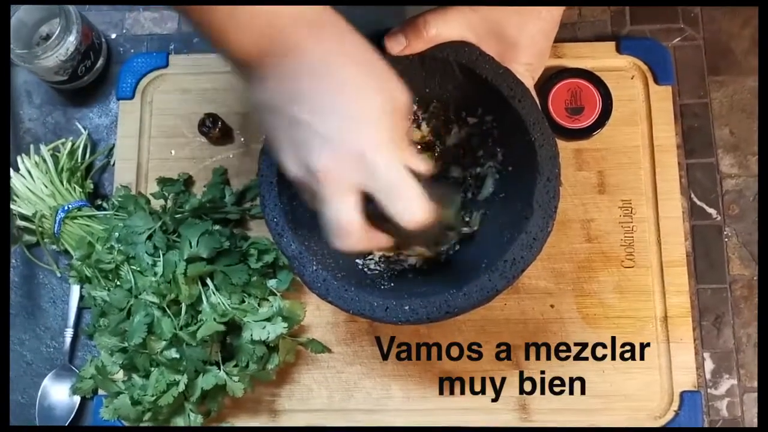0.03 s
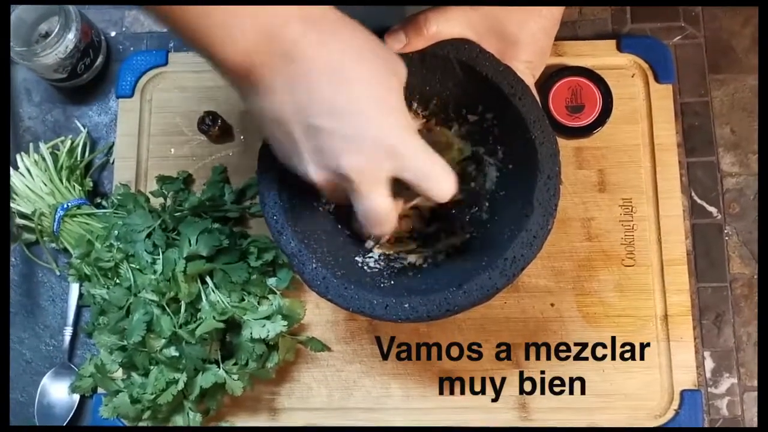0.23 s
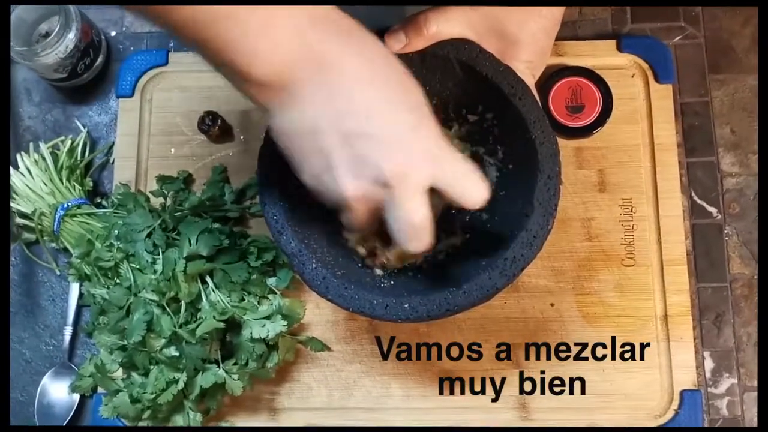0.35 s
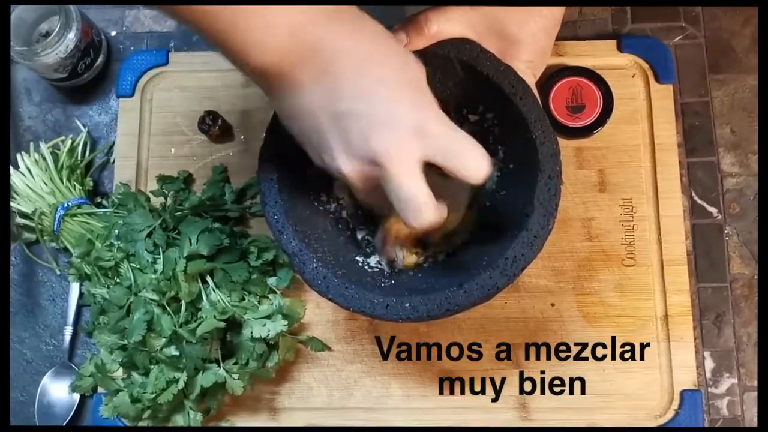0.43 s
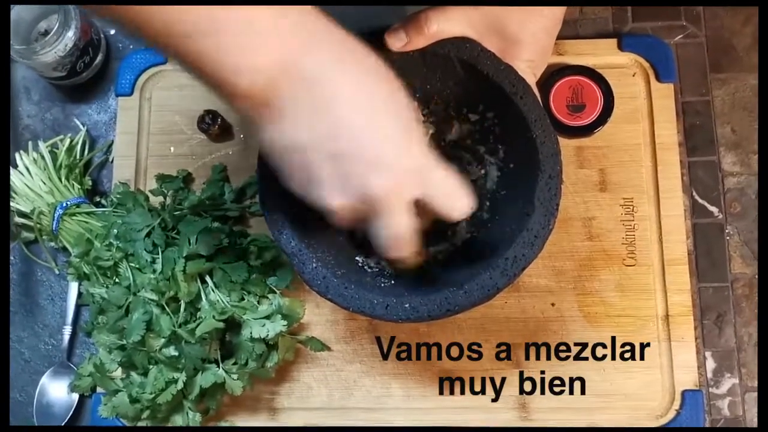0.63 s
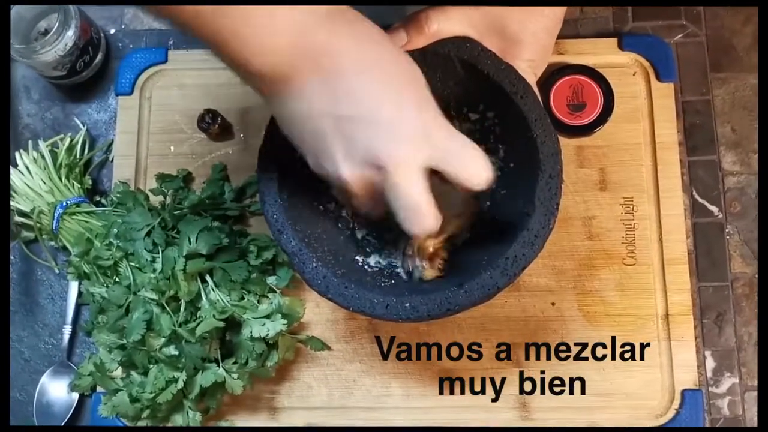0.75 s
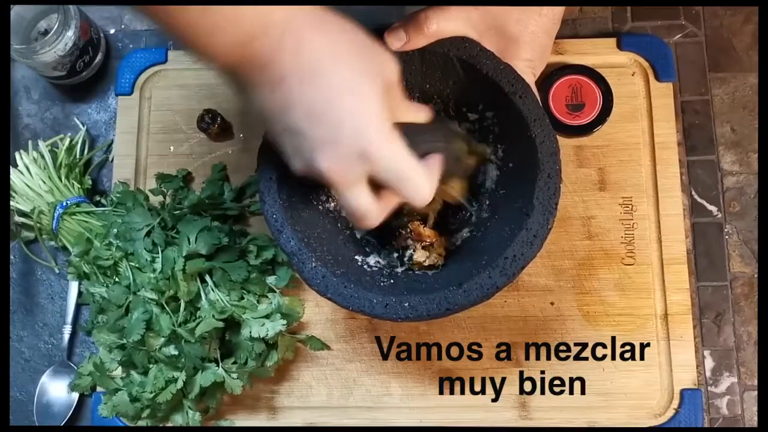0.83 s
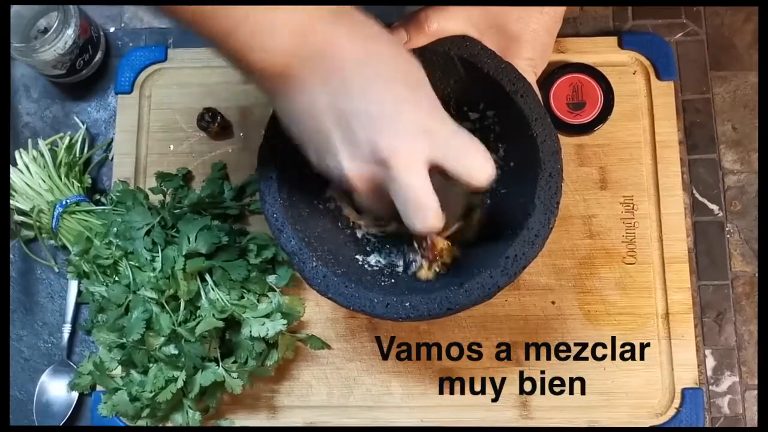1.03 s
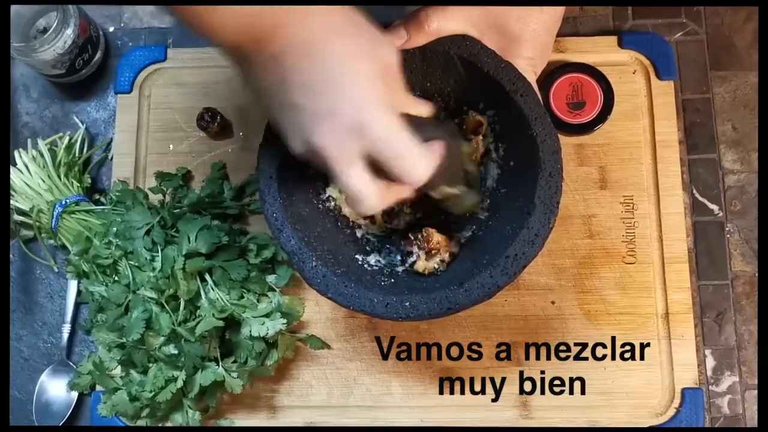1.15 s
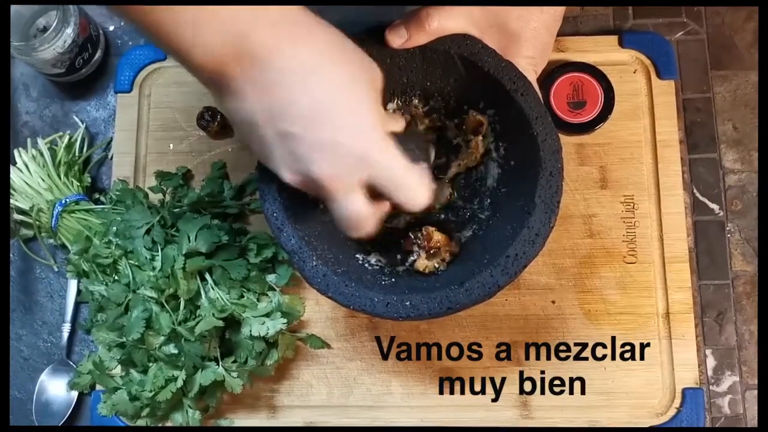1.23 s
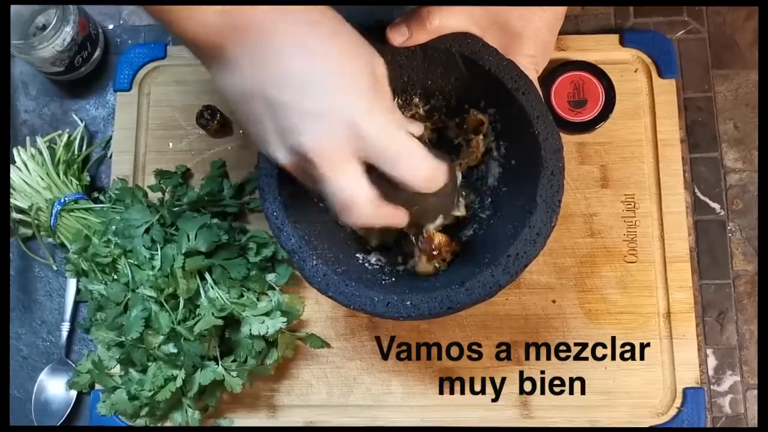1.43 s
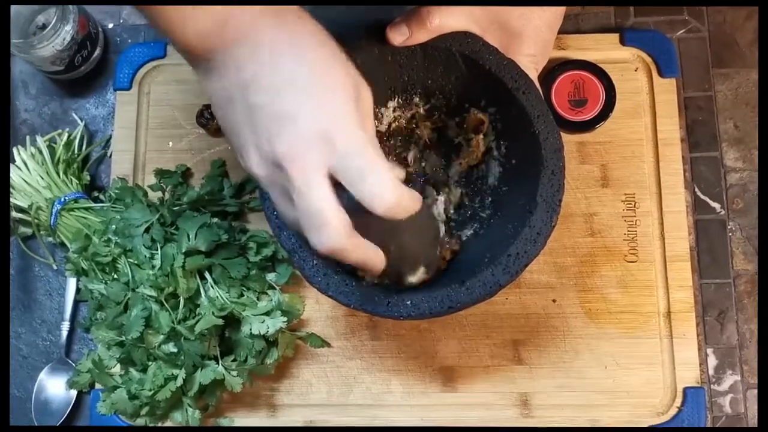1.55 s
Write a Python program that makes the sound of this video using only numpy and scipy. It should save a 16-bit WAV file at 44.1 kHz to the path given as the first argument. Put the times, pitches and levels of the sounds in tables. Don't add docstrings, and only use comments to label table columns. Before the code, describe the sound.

Close up in a quiet kitchen, stone rubs and knocks on stone, with hollow low-mid clacks, stuttering scrapes, fine hiss and tiny seed cracks, starting softly, hitting hardest midway, then stopping before faint room noise.

```python
import sys
import numpy as np
from scipy import signal
from scipy.fft import rfft, irfft, next_fast_len
from scipy.io import wavfile

SR = 44100
rng = np.random.default_rng(int(sys.argv[2]) if len(sys.argv) > 2 else 0)


def digitize_waveform(pressure):
    field = np.atleast_2d(pressure).T
    bounded = np.clip(field, -1, 1)
    quanta = np.round(bounded * 32767).astype(np.int16)
    wavfile.write(sys.argv[1], SR, quanta)


def voltage_ratio(level):
    return 10 ** (np.asarray(level, float) / 20)


N = 70560

# t/s, level/dB, upper modes' level/dB, pestle ping level/dB
KNOCKS = [(0.153, -20.5, -24.5, -39.5), (0.212, -29, -13, -47.5), (0.325, -11, -8, -48.5),
          (0.491, -11, -7.5, -52), (0.519, -16.5, -10.5, -46), (0.548, -12, -1, -50.5),
          (0.625, -5, -6, -33.5), (0.699, -3, -1, -35.5), (0.957, -4.5, -0.5, -26.5),
          (1.001, -6.5, -24, -34.5), (1.033, -10, -1, -30.5), (1.222, -27, -9, -59),
          (1.244, -11, -14.5, -49), (1.266, -6.5, -7.5, -40.5)]
BITE_SHARES = [0.32, 0.54, 0.13]
# f/Hz, level/dB, T60/s
LOW_MODES = [(516, -9.5, 0.026), (561.6, 4.5, 0.052), (644, -5, 0.018), (695.7, -4.5, 0.068),
             (783, -14, 0.085)]
HIGH_MODES = [(790.7, -6.5, 0.066), (925, 1.5, 0.045), (1007, -6, 0.053), (1107, -4, 0.04),
              (1327, -10.5, 0.025), (1456, -17.5, 0.045), (1640, -34.5, 0.076)]
# f/Hz, level/dB, T60/s
PESTLE_MODES = [(2050, -23.5, 0.14), (2120, -5.5, 0.017), (2335, 3, 0.023), (2680, -1.5, 0.013),
                (3300, -20.5, 0.011), (3800, -16, 0.012)]
# f/Hz, level/dB, T60/s
BOARD_MODES = [(233.4, -36, 0.063), (286.9, -36, 0.22), (375, -41.5, 0.12)]


def knocks():
    knock_db, strike_spread_db, bite_lead_s = -6.5, 2, 0.001
    focus = 1.3
    splash_db, splash_t60_s = -4, 0.36
    t, db, high_db, ping_db = np.transpose(KNOCKS)
    modes = [(mode, 0 * db, 1) for mode in LOW_MODES]
    modes += [(mode, high_db + 6.0, -1) for mode in HIGH_MODES]

    bowl = np.zeros(N)
    for (hz, mode_db, t60), extra_db, sense in modes:
        luck_db = strike_spread_db * rng.standard_normal(len(t))
        strength = voltage_ratio(db + extra_db + focus * mode_db + luck_db)
        clicks = np.zeros(N)
        for cycle, share in enumerate(BITE_SHARES):
            clicks[((t - bite_lead_s + cycle / hz) * SR).astype(int)] = share * strength
        bowl += sense * ring(clicks, hz, t60)

    at = (t * SR).astype(int)
    on_pestle, on_board = np.zeros((2, N))
    on_pestle[at] = voltage_ratio(db + ping_db)
    on_board[at] = voltage_ratio(db)
    ping = band(body(on_pestle, PESTLE_MODES), 1700, 4200)
    thud = band(body(on_board, BOARD_MODES), 190, 450)

    fade = signal.lfilter([voltage_ratio(splash_db)], [1, -voltage_ratio(-60 / (splash_t60_s * SR))], on_pestle + 1e-18)
    splash = band(fade * rng.standard_normal(N), 1140, 2490)
    return radiate(voltage_ratio(knock_db) * bowl) + ping + thud + splash


# peak t/s, level/dB, f/Hz, build-up time/s
JUDDERS = [(0.214, -12.5, 585, 0.0019), (0.253, -4.5, 573, 0.0064), (0.277, -14.5, 577, 0.027),
           (0.318, -13, 586, 0.0071), (0.329, -8, 595, 0.0029), (0.343, -13, 640, 0.0021),
           (0.363, -16, 585, 0.01), (0.398, -9.5, 600, 0.004), (0.404, -22.5, 563, 0.0049),
           (0.436, -14, 615, 0.0021), (0.468, -7.5, 586, 0.0035), (0.491, -11, 592, 0.0021),
           (0.522, -23.5, 577, 0.0015), (0.537, -10, 590, 0.003), (0.55, -6.5, 663, 0.0025),
           (0.56, -7.5, 566, 0.0035), (0.574, -5.5, 605, 0.0026), (0.592, -17.5, 497, 0.0026),
           (0.629, -7, 630, 0.0009), (0.693, -6, 585, 0.0054), (0.701, -12.5, 575, 0.0011),
           (0.715, -2, 570, 0.0066), (0.733, -10, 573, 0.021), (0.74, -15.5, 563, 0.0035),
           (0.785, -16, 583, 0.0067), (0.855, -14.5, 636, 0.0028), (0.862, -12, 620, 0.0015),
           (0.875, -15, 551, 0.0031), (0.911, -20, 530, 0.0015), (0.921, -10, 521, 0.0036),
           (0.962, -12, 654, 0.0037), (1.004, -15, 608, 0.004), (1.038, -4.5, 596, 0.0035),
           (1.044, -33.5, 550, 0.0072), (1.06, -18.5, 625, 0.0014), (1.068, -19, 598, 0.016),
           (1.099, -18.5, 599, 0.0022), (1.12, -11.5, 569, 0.013), (1.182, -16.5, 560, 0.0078),
           (1.19, -14, 594, 0.007), (1.2, -20.5, 562, 0.0064), (1.225, -21, 602, 0.0045),
           (1.258, -17.5, 553, 0.0034), (1.269, -6, 631, 0.0014), (1.291, -16, 547, 0.0025),
           (1.298, -15.5, 572, 0.011)]
# peak t/s, level/dB, f/Hz, build-up time/s
HIGH_JUDDERS = [(0.217, -13.5, 812, 0.0016), (0.235, -21.5, 966, 0.0048), (0.254, -17.5, 915, 0.0018),
                (0.327, -27.5, 985, 0.0016), (0.395, -17.5, 921, 0.0031), (0.462, -20, 802, 0.0069),
                (0.47, -19, 1042, 0.0027), (0.493, -15, 901, 0.003), (0.522, -15, 732, 0.00098),
                (0.55, -25.5, 770, 0.0012), (0.561, -11, 922, 0.0039), (0.57, -10, 933, 0.0074),
                (0.585, -21, 1014, 0.0017), (0.594, -16.5, 834, 0.0011), (0.627, -9.5, 870, 0.00086),
                (0.703, -18, 864, 0.0097), (0.713, -42, 925, 0.0068), (0.723, -23.5, 1030, 0.002),
                (0.732, -29, 880, 0.002), (0.762, -17, 928, 0.0029), (0.788, -23.5, 930, 0.0046),
                (0.869, -21.5, 934, 0.0023), (0.88, -12, 886, 0.0014), (0.915, -15, 999, 0.003),
                (0.924, -11.5, 813, 0.0012), (0.96, -17, 904, 0.002), (1.006, -20.5, 967, 0.0028),
                (1.018, -19.5, 977, 0.0043), (1.037, -21, 993, 0.0063), (1.045, -21.5, 837, 0.002),
                (1.109, -18.5, 872, 0.0043), (1.186, -18, 933, 0.0035), (1.195, -16.5, 934, 0.004),
                (1.202, -15.5, 910, 0.002), (1.222, -20.5, 814, 0.0019), (1.268, -7.5, 868, 0.0007)]


def judders():
    judder_db, ring_db = -1, -51.5
    let_go_s, catch_lead_s = 0.0026, 0.00043
    suddenness = 0.9
    lines = np.zeros((2, N))
    for line, rows in zip(lines, (JUDDERS, HIGH_JUDDERS)):
        for t, db, hz, build_s in rows:
            i = np.arange(max(int((t - 0.05) * SR), 0), int((t + 0.04) * SR))
            age = i / SR - t + catch_lead_s
            build = -(age / max(build_s, 0.001)) ** 2 * suddenness
            let_go = 1 - np.sqrt(1 + (age / let_go_s) ** 2)
            envelope = np.exp(np.where(age < 0, build, let_go))
            line[i] += voltage_ratio(db + judder_db) * envelope * np.cos(2 * np.pi * hz * age)
    sent = highpass(lines.sum(axis=0), 380)
    ringing = body(lines[0], LOW_MODES) + body(lines[1], HIGH_MODES)
    return sent + voltage_ratio(ring_db) * radiate(ringing)


# t/s, level/dB
PRESSURE = [(0, -37), (.19, -33.5), (.23, -25), (.45, -21), (.59, -36.5), (.62, -64.5), (.67, -19),
            (.73, -17.5), (.82, -28), (.9, -25.5), (.95, -37), (1.06, -15.5), (1.145, -26), (1.2, -24),
            (1.3, -23), (1.37, -39.5), (1.44, -58), (1.6, -82)]


def rumble():
    bumps_per_s, bump_spread_db = 1500, 3.0
    rumble_db, waver_db = -10.0, 1.8
    high_db, ping_db = -5, -36
    push = voltage_ratio(in_time(PRESSURE) + rumble_db + waver_db * drift(20))
    low, high, ping = (grains(bumps_per_s, bump_spread_db) for _ in range(3))
    out = rms_one(body(band(low, 350, CONTACT_HZ), LOW_MODES + BOARD_MODES))
    out += voltage_ratio(high_db) * rms_one(body(radiate(high), HIGH_MODES))
    out += voltage_ratio(ping_db) * rms_one(body(ping, PESTLE_MODES))
    return push * out


# t/s, level/dB
SLIDE = [(0, -50.5), (.12, -52.5), (.29, -45.5), (.37, -45.5), (.4, -54), (.46, -44), (.6, -51),
         (.635, -62), (.695, -41.5), (.745, -57.5), (.79, -50.5), (.94, -47), (.98, -65.5), (1.01, -53),
         (1.14, -55), (1.34, -62), (1.4, -70), (1.6, -75)]
# middle t/s, half length/s, level/dB
DUST = [
    (.04, .07, 10),
    (.17, 0.039, 9.5),
    (.335, .04, 3),
    (.56, 0.034, 3.5),
    (.7, .004, 5),
    (.81, .03, 2.5),
    (.89, .04, 4.5),
    (1.215, .025, 8),
    (1.33, 0.012, 8),
]


def grit():
    grains_per_s, spread_db = 5200, 3.5
    grit_db, patch_db, dust_floor_db = -3.5, 3, -8
    burst = drift(70)
    sources = []
    for _ in HOLLOW:
        patches = voltage_ratio(patch_db * (burst + 0.9 * drift(30)))
        sources.append(grains(grains_per_s, spread_db) * patches)
    sources[-1] *= voltage_ratio(dust_floor_db) + swells(DUST)
    return voltage_ratio(in_time(SLIDE) + grit_db) * rms_one(hollow(sources))


# f/Hz, bandwidth/Hz, level/dB
HOLLOW = [(2480, 73, -12), (3400, 1140, 6), (3900, 570, -11), (4900, 210, -8), (5650, 1000, 1),
          (7600, 1000, -9), (8920, 620, -7.5), (11200, 2700, -12.5)]


def hollow(sources):
    out = 0
    for x, (hz, width, db) in zip(sources, HOLLOW):
        out = out + voltage_ratio(db) * band(x, hz - width / 2, hz + width / 2) / np.sqrt(width / SR)
    return out


# t/s, peak level/dB, f/Hz
CRACKS = [(0.0942, -39, 3980), (0.139, -30.5, 5600), (0.186, -31, 4220), (0.2656, -29.5, 4140),
          (0.3486, -30, 5700), (0.3669, -20.5, 3610), (0.4575, -20.5, 3410), (0.4802, -25, 3470),
          (0.5217, -30, 5620), (0.535, -47.5, 3900), (0.5643, -22.5, 5150), (0.6909, -29, 3430),
          (0.857, -30, 3580), (0.9554, -32.5, 3400), (0.9989, -31, 5340), (1.0068, -28.5, 3460),
          (1.0225, -31, 3600), (1.1544, -45, 5600), (1.2093, -31.5, 5690), (1.3202, -34, 3530),
          (1.377, -43.5, 3240)]


def cracks():
    crack_db, tick_db, cycles = -9, -12.5, 40
    out, ticks = np.zeros((2, N))
    for t, db, hz in CRACKS:
        i = int(t * SR)
        click = np.zeros(500)
        click[0] = voltage_ratio(db + crack_db)
        ticks[i] = voltage_ratio(db + tick_db)
        out[i:i + 500] += ring(click, hz, cycles / hz)[:N - i]
    return highpass(out, 2500) + hollow([ticks] * len(HOLLOW)) / 2


# middle t/s, half length/s, level/dB
SINGS = [
    (.03, 0.1, -58.5),
    (.39, 0.026, -46),
    (.47, 0.024, -55.5),
    (.56, 0.081, -60),
    (.71, 0.023, -50),
    (1.06, 0.085, -60),
    (1.23, 0.04, -77.5),
]


def singing():
    hz, width_hz = 2300, 150
    tone = band(grains(3000, 2.5), hz - width_hz / 2, hz + width_hz / 2)
    return swells(SINGS) * rms_one(tone)


def kitchen(x):
    t60_s, wall_cut_hz = 0.37, 3000
    size = next_fast_len(2 * N)
    hz = np.arange(size // 2 + 1) * SR / size
    response = 0
    for k, lag in enumerate(rng.uniform(0.014, 0.04, 10)):
        loss = voltage_ratio(-60 * lag / t60_s) / (1 + 1j * hz / wall_cut_hz)
        echo = loss * np.exp(-2j * np.pi * hz * lag)
        response = response + (-1) ** k * echo / (1 - echo)
    return irfft(rfft(x, size) * response, size)[:N]


# f/Hz, spectral level/dB
AIR = [(20, 3), (40, -10.5), (70, -18.5), (200, -19.5), (600, -14.5), (1600, -28.5), (3500, -45.5),
       (8000, -66), (12000, -41.5)]


def air():
    air_db, hum_hz, hum_db = -53, 119, -70
    rustle_db, rustle_t60_s = -43, 0.29
    edges = 18 * 2 ** np.arange(0, 9.9, 0.5)
    white = rng.standard_normal((2, N + 9000))
    hz, db = np.transpose(AIR)
    room = 0
    for k, (low, high) in enumerate(zip(edges, edges[1:])):
        band_db = np.interp(np.log(low * high) / 2, np.log(hz), db)
        room = room + band(white[k % 2], low, high)[9000:] * voltage_ratio(band_db + 2 * drift(6.0))
    t = np.arange(N) / SR
    hum = voltage_ratio(hum_db + 4.5 * drift(3.9)) * np.sin(2 * np.pi * hum_hz * t)
    rustle = rms_one(band(grains(5100, 1.5), 353, 2510))
    return voltage_ratio(air_db) * rms_one(room) + hum + voltage_ratio(rustle_db - 60 * t / rustle_t60_s) * rustle


def ring(force, hz, t60):
    r, w = voltage_ratio(-60 / (t60 * SR)), 2 * np.pi * hz / SR
    return signal.lfilter([0, np.sin(w)], [1, -2 * r * np.cos(w), r * r], force + 1e-18)


def body(force, modes):
    out = 0
    for k, (hz, db, t60) in enumerate(modes):
        out = out + (-1) ** k * voltage_ratio(db) * ring(force, hz, t60)
    return out


CONTACT_HZ = 1273


def radiate(x):
    x = highpass(x, 675, order=4)
    return signal.sosfilt(signal.butter(4, CONTACT_HZ, fs=SR, output="sos"), x)


def grains(per_s, spread_db):
    sizes = voltage_ratio(spread_db * np.minimum(rng.exponential(1, N), 4))
    signs = rng.choice([-1, 1], N)
    return sizes * signs * (rng.random(N) < per_s / SR)


def drift(rate_hz):
    r = np.exp(-2 * np.pi * rate_hz / SR)
    return rms_one(signal.lfilter([1], [1, -2 * r, r * r], rng.standard_normal(N + 9000))[9000:])


def swells(rows):
    t = np.arange(N) / SR
    return sum(voltage_ratio(db) * np.exp(-((t - s) / max(half, 0.003)) ** 6) for s, half, db in rows)


def in_time(rows):
    t, db = np.transpose(rows)
    return np.interp(np.arange(N) / SR, t, db)


def rms_one(x):
    return x / np.sqrt(np.mean(x ** 2) + 1e-20)


def band(x, low_hz, high_hz, order=2):
    return signal.sosfilt(signal.butter(order, [low_hz, high_hz], "band", fs=SR, output="sos"), x)


def highpass(x, hz, order=2):
    return signal.sosfilt(signal.butter(order, hz, "high", fs=SR, output="sos"), x)


def scene():
    kitchen_db = -24.5
    mortar = knocks() + judders() + rumble() + grit() + cracks() + singing()
    return (mortar + voltage_ratio(kitchen_db) * kitchen(mortar) + air())[None]


def band_limit(x):
    return signal.sosfilt(signal.butter(12, 15700, fs=SR, output="sos"), x)


def record(dry):
    cutoff_hz, leak_db = 8700, -15
    kept = signal.sosfilt(signal.cheby2(12, 60, cutoff_hz * 1.101, fs=SR, output="sos"), dry)
    leak = band(dry, 9600, 15000, order=4)
    return band_limit(kept + voltage_ratio(leak_db) * leak)


dry = scene()
out = record(dry)
digitize_waveform(out)
```